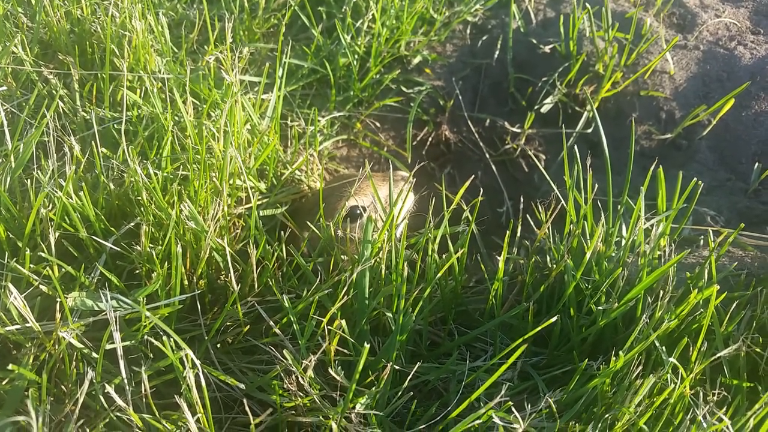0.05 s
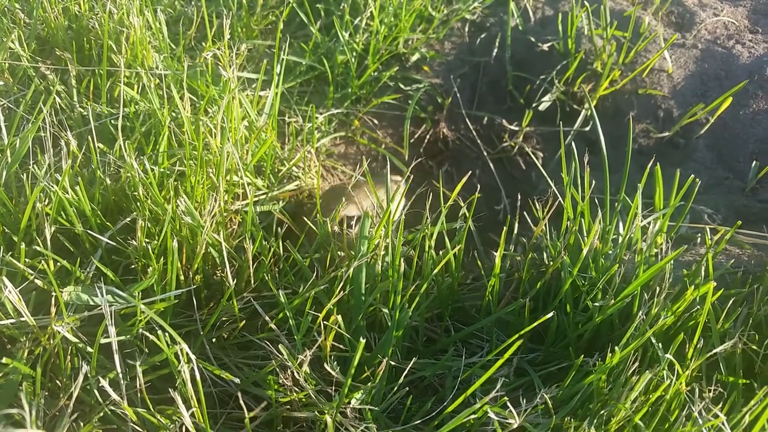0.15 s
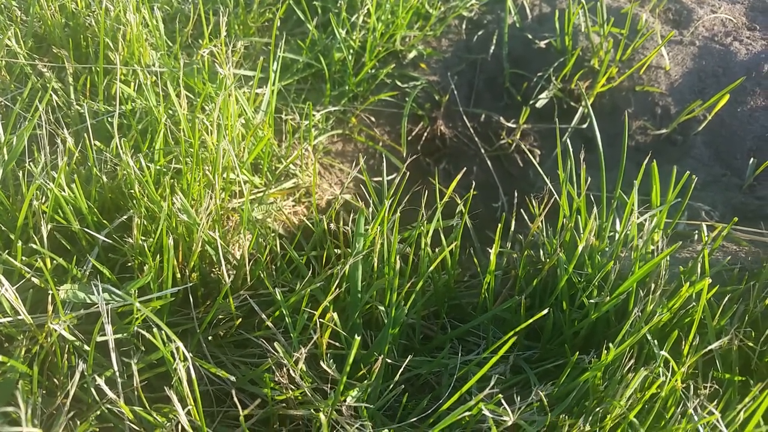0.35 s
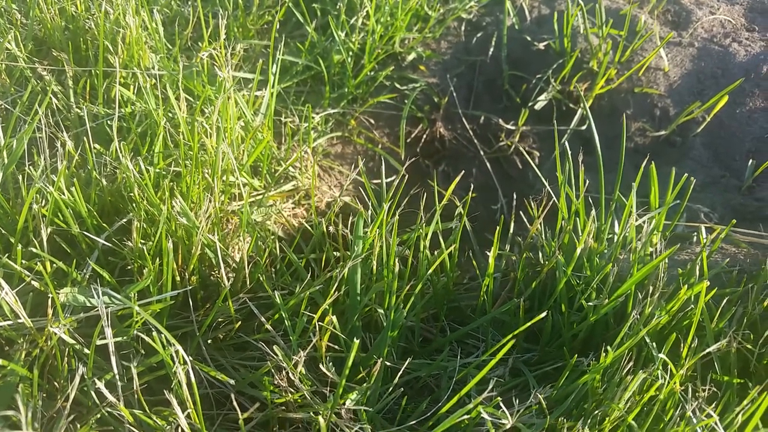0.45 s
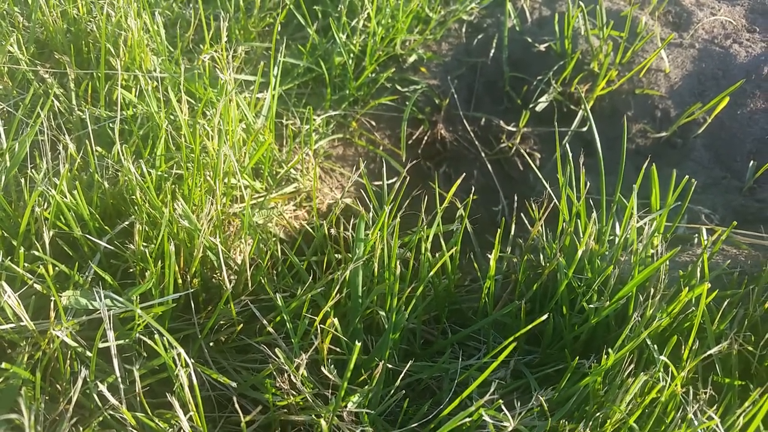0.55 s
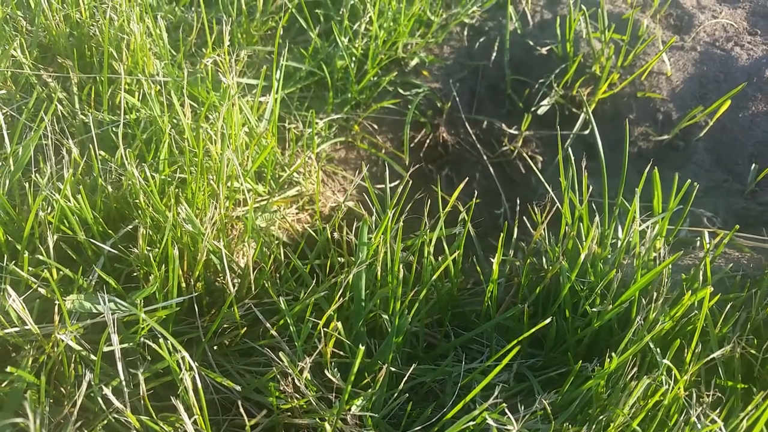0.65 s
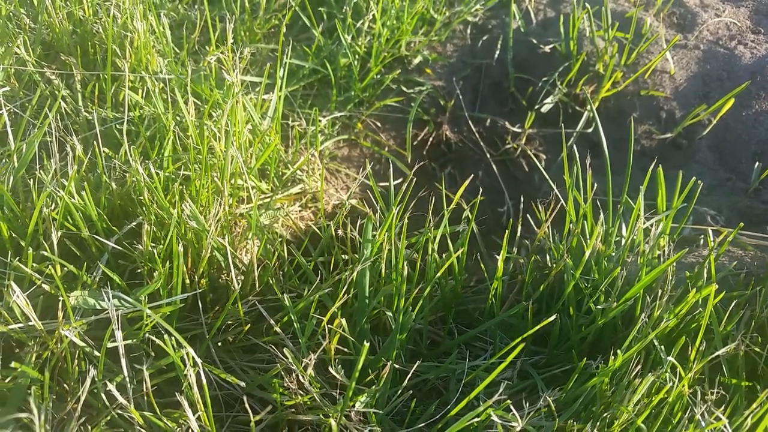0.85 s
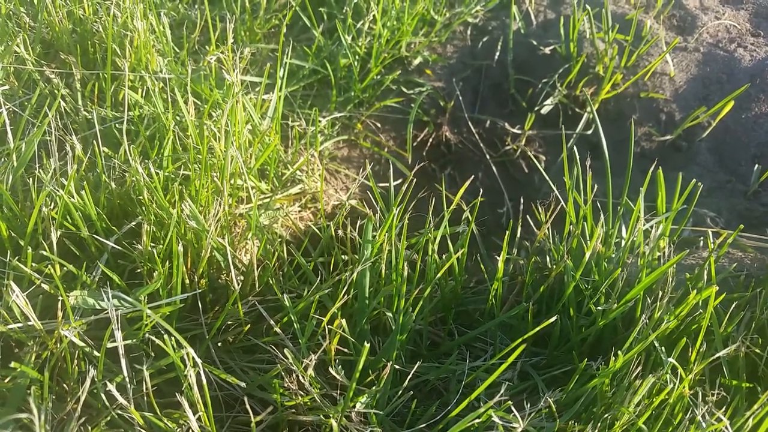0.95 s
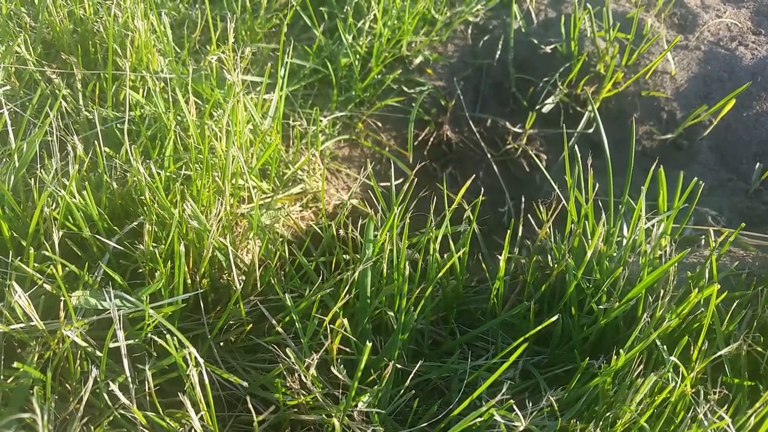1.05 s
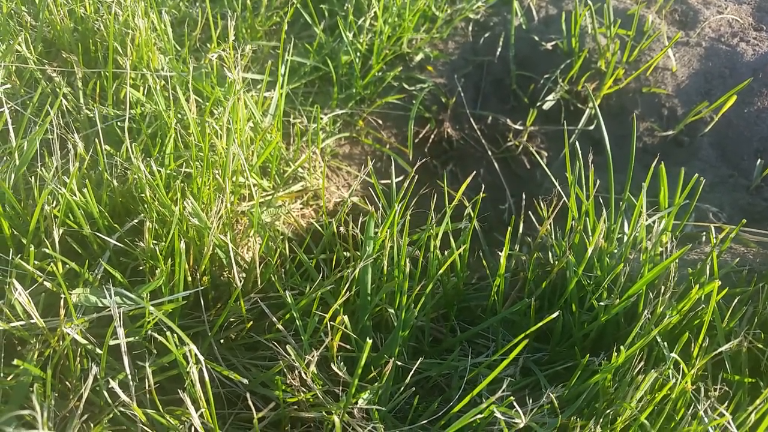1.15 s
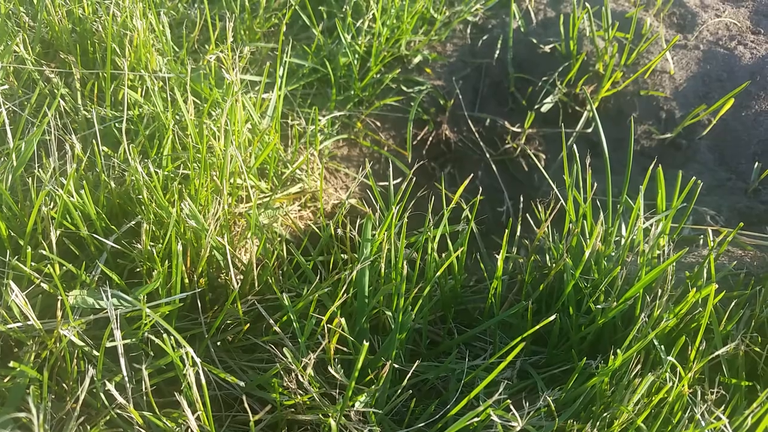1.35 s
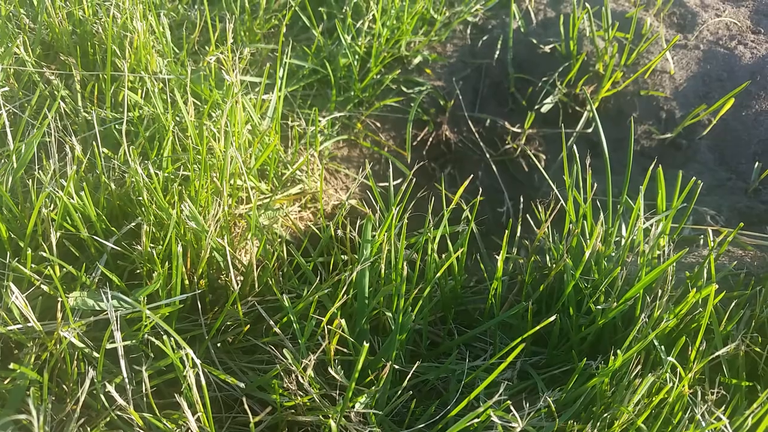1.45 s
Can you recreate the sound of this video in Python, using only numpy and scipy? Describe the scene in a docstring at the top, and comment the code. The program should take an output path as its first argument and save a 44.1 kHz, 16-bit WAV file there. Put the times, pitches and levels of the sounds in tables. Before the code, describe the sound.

A ground squirrel close by gives one piercing, very high whistle from about 0.2 to 0.4 seconds, sliding slightly down and briefly distorting near its start. A faint falling squeak follows around 0.5 seconds as it drops into its burrow. Soft grass rustles and ticks die away by 0.7 seconds. Light wind rumbles on the microphone throughout, over a faint distant hum, until the end at about 1.5 seconds.

```python
"""Light wind rumbles on the microphone over a faint, distant hum, and grass rustles and ticks.
At 0.22 s a ground squirrel close by gives one piercing whistle, a nearly pure tone falling from
10 to 8 kHz. Early in the call the right channel overloads, and its overtones alias into crossing
glides. At 0.45 s the animal drops into its burrow with a faint squeak; the rustle dies away
and the wind remains."""
import sys
import numpy as np
from scipy import signal
from scipy.fft import rfft, irfft
from scipy.io import wavfile

SR = 44100
rng = np.random.default_rng(int(sys.argv[2]) if len(sys.argv) > 2 else 0)


def dump_mix(stems):
    """Bounce the given channels to the path in sys.argv[1] as a 16-bit WAV at rate SR."""
    frames = np.atleast_2d(stems).T  # one column per channel
    limited = np.clip(frames, -1, 1)  # hard clip at full scale
    pcm = np.round(limited * 32767).astype(np.int16)
    wavfile.write(sys.argv[1], SR, pcm)


N = 66150

# pitch of the whistle: t/s, f/Hz
WHISTLE_PITCH = [(.218, 10150), (.223, 9570), (.228, 9530), (.240, 9330), (.250, 9235), (.257, 9210),
                 (.270, 9075), (.280, 9005), (.291, 8895), (.296, 8890), (.315, 8680), (.326, 8700),
                 (.341, 8650), (.350, 8510), (.358, 8480), (.366, 8555), (.388, 8380), (.396, 8520),
                 (.401, 8520), (.413, 8310), (.427, 8190), (.432, 7950)]
# whistle at the left and right microphone ports: t/s, level/dB
WHISTLE_LEFT = [(.219, -25), (.280, -19.5), (.298, -17), (.309, -15.5), (.337, -9), (.366, -10),
                (.380, -8.5), (.400, -9)]
WHISTLE_RIGHT = [(.219, -26.5), (.239, -15), (.291, -9), (.309, -11.5), (.335, -9.5), (.353, -17.5),
                 (.370, -19), (.399, -29.5), (.426, -17.5)]
# later arrival at the left port as the animal moves: t/s, lag/s
LEFT_LAG = [(.228, 33e-6), (.295, 68e-6), (.340, 66e-6), (.399, 21e-6), (.415, 38e-6)]
# spectrum of the breath in the whistle: f/Hz, relative level/dB
BREATH_SPECTRUM = [(600, -24), (2500, -18), (4500, -11), (6500, -12.5), (7800, -17), (10000, -10.5),
                   (11600, 7.5), (13200, -7), (15500, -4.5)]
# overtones of the overloaded channel: harmonic number, level/dB
OVERLOAD_HARMONICS = {4: -42, 5: -33, 6: -47, 7: -52, 9: -46.5, 10: -50, 11: -55}
# spectrum of the overload's grit: f/Hz, relative level/dB
GRIT_SPECTRUM = [(40, -14.5), (150, 6), (400, 5.5), (900, -7.5), (3000, -3), (6000, -10), (9000, -28),
                 (12000, 2.5), (16000, 0)]
# parting squeak: t/s, f/Hz, fundamental level/dB, octave level/dB, left minus right/dB
SQUEAK_CONTOUR = [(.450, 6280, -45, -49.5, 1), (.459, 6120, -58, -62, 4), (.468, 6084, -53.5, -70, -18.5),
                  (.479, 5540, -51.5, -56.5, -1), (.494, 5390, -58, -57, 2), (.503, 5050, -60.5, -81, 4),
                  (.511, 4730, -70, -69, 9)]
# the animal brushing through grass: t/s, rustle level/dB, crisp treble level/dB
RUSTLE_LEVELS = [(0, -78, -107), (.17, -80, -101), (.22, -74, -78), (.40, -80.5, -83), (.46, -73.5, -72.5),
                 (.52, -84.5, -81), (.60, -85, -91.5), (.75, -100, -105)]
# spectra of the rustle and of its crisp treble: f/Hz, relative level/dB
RUSTLE_SPECTRUM = [(200, 19), (600, 9.5), (1500, 5.5), (2700, -4), (4000, -1.5), (6000, -15),
                   (16000, -23.5)]
CRISP_SPECTRUM = [(2000, -21), (4500, -4.5), (8500, -1), (12000, 0.5), (16000, -5)]
# snapping stalks: t/s, level/dB, tilt/(dB per octave), left minus right/dB
STALK_SNAPS = [(.1922, -50, -3, 2), (.3015, -59, -6, -16), (.4440, -62, -9, 3), (.4500, -59, 5, 3),
               (.5350, -70, 5, 9), (.5398, -66, 4, 7)]
# spectra of the wind's rumble and of the steady hiss: f/Hz, relative level/dB
RUMBLE_SPECTRUM = [(20, -2), (45, -5), (90, 1.5), (135, 0), (200, -6), (300, -15.5), (420, -22), (540, -30),
                   (700, -41), (1200, -51.5), (3000, -73.5)]
HISS_SPECTRUM = [(100, 4), (800, 5), (1500, 2), (2700, -1.5), (5000, -3), (9000, -4.5), (16000, -0.5)]
# gusts, and the port ringing that wind excites: t/s, level/dB
GUST_LEVELS = [(0, -55.5), (.07, -56), (.16, -51.5), (.22, -55), (.40, -62.5), (.46, -58), (.58, -64),
               (.85, -63.5), (1.0, -60.5), (1.15, -62.5), (1.35, -60.5), (1.5, -50)]
PORT_RING_LEVELS = [(0, -82), (.2, -79.5), (.5, -87.5), (.8, -95), (1.18, -97.5), (1.26, -94), (1.5, -84.5)]
# tones of the distant hum: f/Hz, level/dB
HUM_TONES = [(128, -72), (242, -83.5), (368, -85), (430, -91), (530, -90)]


def whistle(hz, phase, start=.218, end=.43176):
    """A nearly pure tone with breath noise; a path difference delays its phase at the left port."""
    shimmer_db = .2 * walk(250)
    amplitude = undb(np.array([curve(WHISTLE_LEFT), curve(WHISTLE_RIGHT)]) + shimmer_db)
    amplitude = amplitude * gate(start, end, attack=.0015, release=.029)
    left_phase = phase - 2 * np.pi * hz * curve(LEFT_LAG)
    breath = undb(-63.5) * noise(BREATH_SPECTRUM) * gate(start, end, attack=.0015, release=.05)
    return amplitude * np.sin([left_phase, phase]) + breath * pan(3)


def overload(phase, start=.2385, end=.2985, converter_hz=48000):
    """Aliasing: the right channel's overtones fold about multiples of the converter rate, amid grit."""
    onset_hz = np.interp(start, *np.array(WHISTLE_PITCH).T)
    aliases = 0
    for k, db in OVERLOAD_HARMONICS.items():
        mirror_hz = converter_hz * np.round(k * onset_hz / converter_hz)
        flicker_db = 2.2 * k / max(OVERLOAD_HARMONICS) * walk(300)
        aliases += undb(db + flicker_db) * np.sin(k * phase - 2 * np.pi * mirror_hz * clock())
    grit = undb(-45.5) * noise(GRIT_SPECTRUM)
    right_only = np.array([[0], [1]])
    return gate(start, end, attack=.011, release=.011) * (aliases + grit) * right_only


def squeak(edge_s=.0012):
    """Two harmonics glide down together as they fade, in phase quadrature between the channels."""
    phase = running_phase(curve(SQUEAK_CONTOUR)) + np.array([[0], [np.pi / 2]])
    fundamental = undb(curve(SQUEAK_CONTOUR, column=2)) * np.sin(phase)
    octave = undb(curve(SQUEAK_CONTOUR, column=3)) * np.sin(phase + phase[0])
    envelope = gate(SQUEAK_CONTOUR[0][0] - edge_s, SQUEAK_CONTOUR[-1][0] + edge_s, edge_s, edge_s)
    return (fundamental + octave) * pan(curve(SQUEAK_CONTOUR, column=4)) * envelope


def ground_scatter(calls, t60_s=.1201):
    """Diffuse reflection from ground and grass: convolution with exponentially decaying noise."""
    tail = rng.standard_normal((2, N)) * np.exp(-np.log(1000) * clock() / t60_s)
    tail = tail / np.sqrt(np.sum(tail ** 2) / 2)
    return undb(-38) * signal.fftconvolve(calls, tail, axes=1)[:, :N]


def grass_rustle():
    """Friction of the animal against grass: two noise bands, each unevenly modulated in level."""
    body = undb(curve(RUSTLE_LEVELS) + 2.18 * walk(70)) * noise(RUSTLE_SPECTRUM)
    crisp = undb(curve(RUSTLE_LEVELS, column=2) + 2.5 * walk(120)) * noise(CRISP_SPECTRUM)
    return body + crisp


def stalk_snaps(decay_s=.0012, peak_db=8):
    """Each fracture is a transient: exponentially damped noise with one broad resonance."""
    snaps = 0
    for start, db, tilt_db, pan_db in STALK_SNAPS:
        age = clock() - start
        envelope = (age > 0) * np.exp(-abs(age) / decay_s)
        crack = shaped(lambda f: undb(
            tilt_db * np.log2(f + 300) + peak_db * resonance(f, hz=4600, width_hz=1300)))
        snaps += undb(db) * pan(pan_db) * crack * envelope
    return snaps


def wind():
    """Turbulent gusts rumble on the microphone and excite its port resonance, over a steady hiss."""
    mid, side = noise(RUMBLE_SPECTRUM)
    rumble = undb(curve(GUST_LEVELS)) * (mid + undb(-8.5) * side * np.array([[1], [-1]]))
    port_noise = shaped(lambda f: resonance(f, hz=3799.5, width_hz=560))
    port_ring = undb(curve(PORT_RING_LEVELS)) * port_noise * pan(6)
    flicker = undb(1.37 * walk(12))
    hiss = undb(-89.5) * noise(HISS_SPECTRUM)
    return flicker * (rumble + port_ring) + hiss


def distant_hum(swell_db=4, waver=.03):
    """Low tones swell and waver by slow random modulation of amplitude and frequency."""
    hum = 0
    for hz, db in HUM_TONES:
        amplitude = undb(db + swell_db * walk(7))
        hum += amplitude * np.sin(running_phase(hz * (1 + waver * walk(12))))
    return hum


def undb(db):
    """Amplitude ratio of a level in decibels."""
    return 10 ** (np.asarray(db) / 20)


def clock():
    """Time of each sample in seconds."""
    return np.arange(N) / SR


def curve(rows, column=1):
    """Linear interpolation of one table column over time."""
    rows = np.array(rows)
    return np.interp(clock(), rows[:, 0], rows[:, column])


def gate(start, end, attack, release):
    """Trapezoidal envelope; all times in seconds."""
    t = clock()
    return np.clip((t - start) / attack, 0, 1) * np.clip((end - t) / release, 0, 1)


def pan(db):
    """Left and right gains for a level difference."""
    return undb(db * np.array([[1], [-1]]) / 2)


def resonance(f, hz, width_hz):
    """Lorentzian resonance curve, 1 at its centre."""
    return 1 / (1 + (2 * (f - hz) / width_hz) ** 2)


def shaped(gain):
    """Spectral filtering: two independent noises of joint rms 1, weighted by gain(f)."""
    f = np.arange(N // 2 + 1) * SR / N + 1
    filtered = irfft(rfft(rng.standard_normal((2, N))) * gain(f), N)
    return filtered / filtered.std()


def noise(spectrum):
    """Stereo noise whose spectral envelope is interpolated over log frequency."""
    hz, db = np.array(spectrum).T
    return shaped(lambda f: undb(np.interp(np.log(f), np.log(hz), db)))


def walk(rate_hz):
    """Low-pass random fluctuation with a standard deviation near 1."""
    return shaped(lambda f: 1 / (1 + (f / rate_hz) ** 2) ** 2)[0]


def running_phase(hz, jitter=.0008):
    """Phase is the time integral of frequency, here with slight jitter."""
    return 2 * np.pi * np.cumsum(hz * (1 + jitter * walk(250))) / SR


def scene():
    """Superposition of the calls, their scatter and overload, the grass and the background."""
    hz = curve(WHISTLE_PITCH)
    phase = running_phase(hz)
    calls = whistle(hz, phase) + squeak()
    foreground = calls + ground_scatter(calls) + overload(phase)
    return foreground + grass_rustle() + stalk_snaps() + wind() + distant_hum()


def record(dry, cutoff_hz=16000):
    """Band limiting: a steep elliptic low-pass removes the highest treble."""
    return signal.sosfilt(signal.ellip(10, .1, 80, cutoff_hz, fs=SR, output="sos"), dry)


dry = scene()
out = record(dry)
dump_mix(out)
```